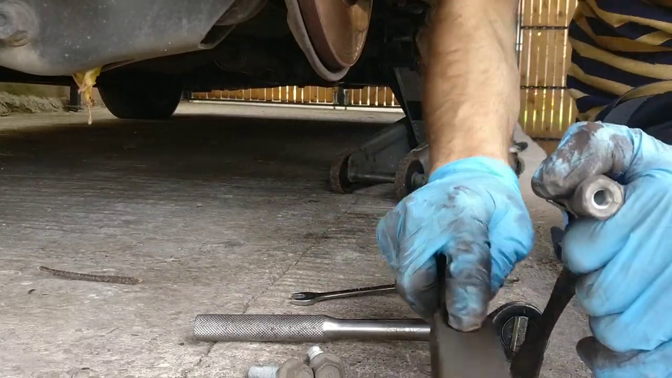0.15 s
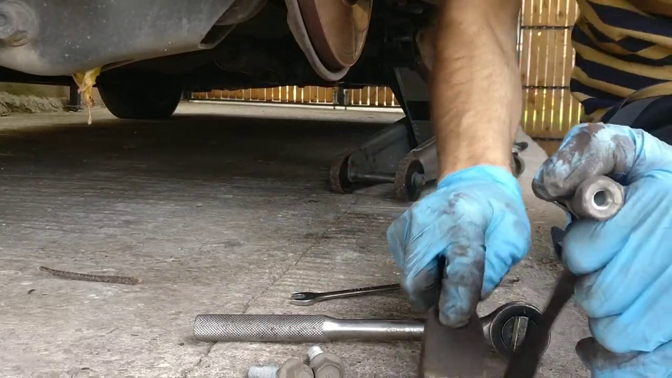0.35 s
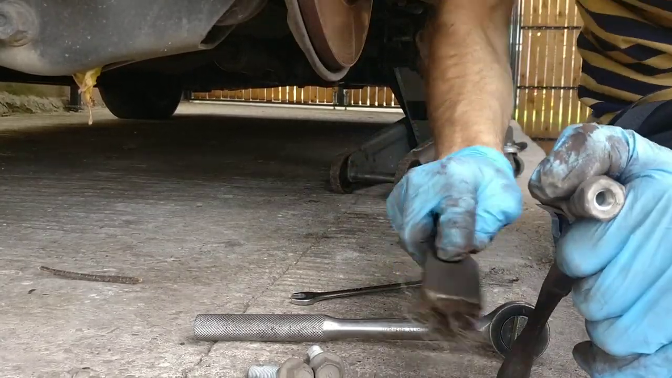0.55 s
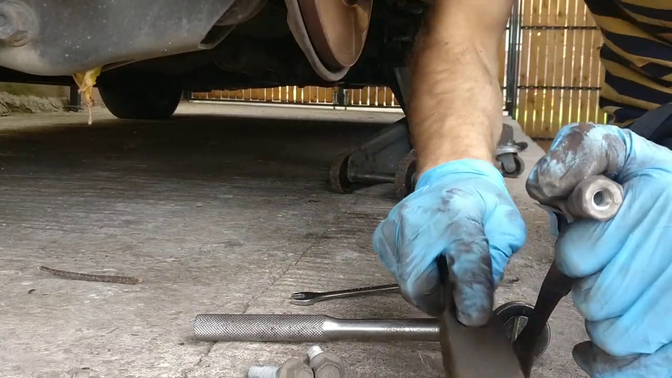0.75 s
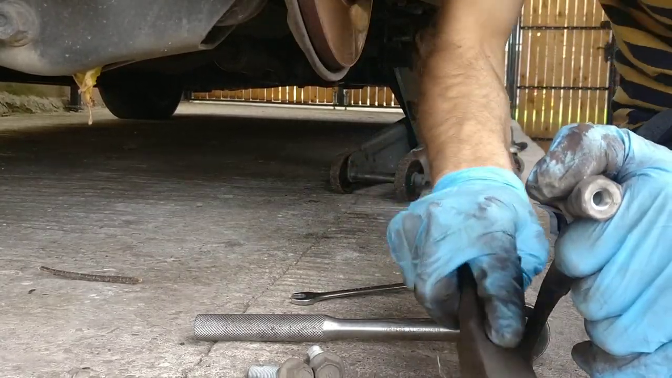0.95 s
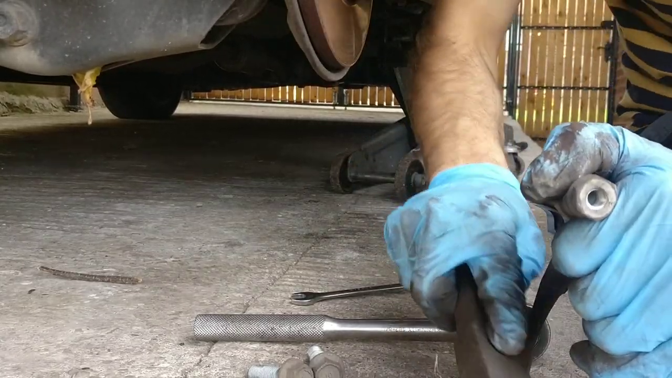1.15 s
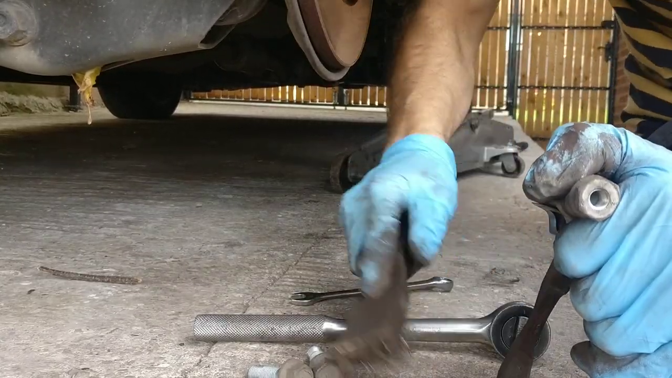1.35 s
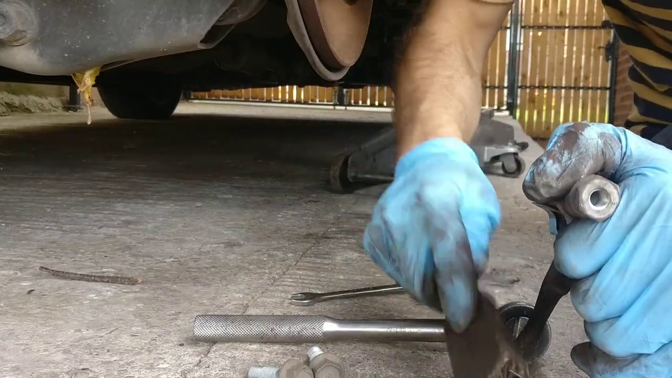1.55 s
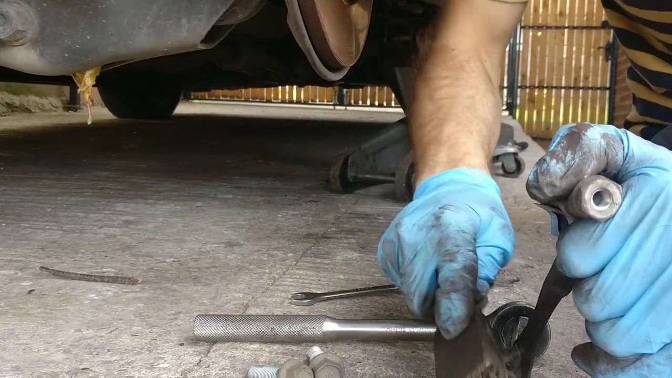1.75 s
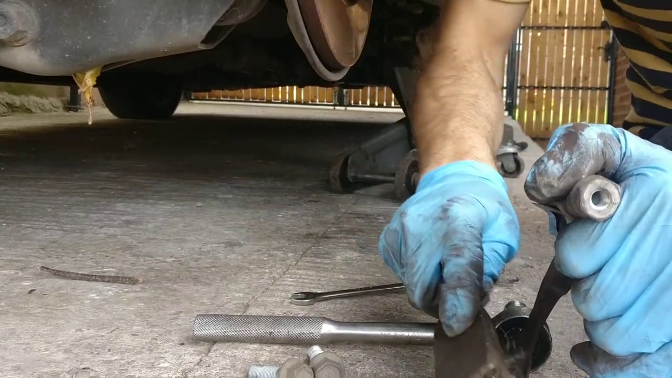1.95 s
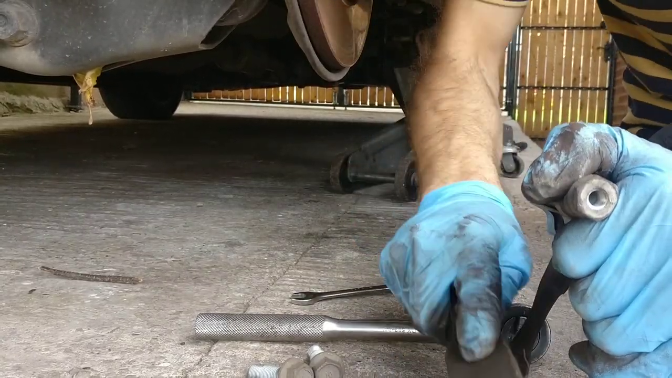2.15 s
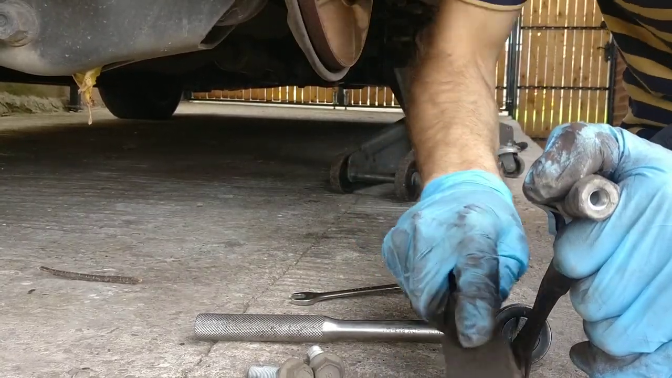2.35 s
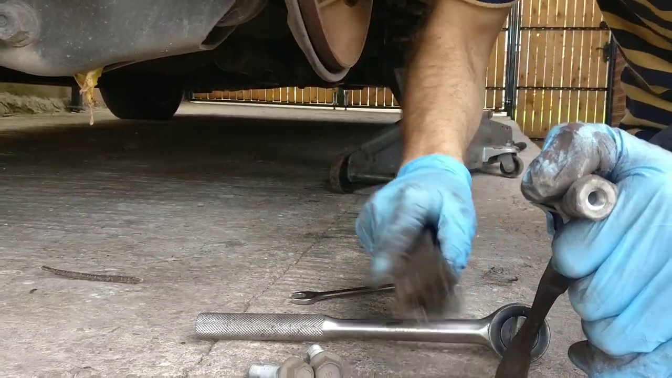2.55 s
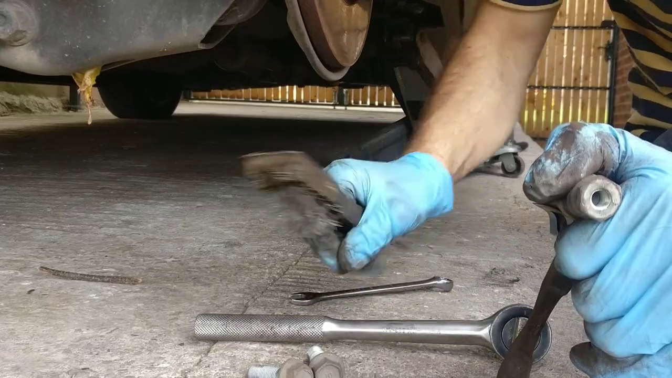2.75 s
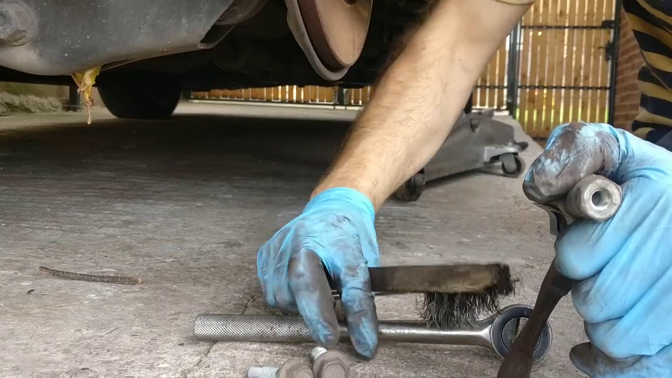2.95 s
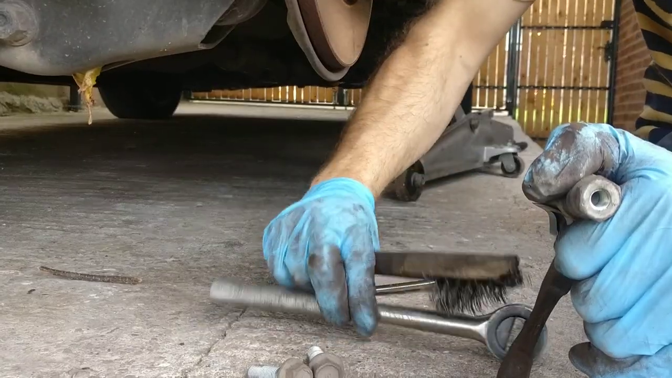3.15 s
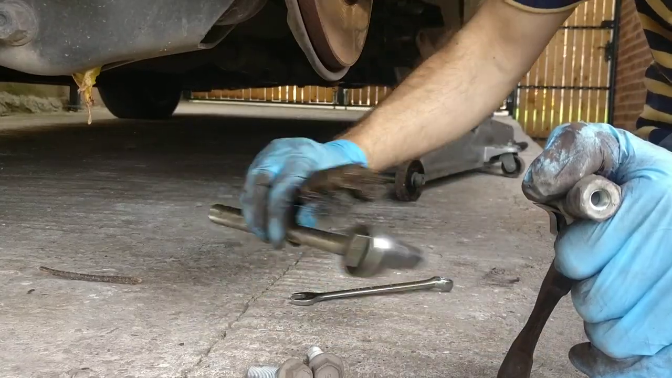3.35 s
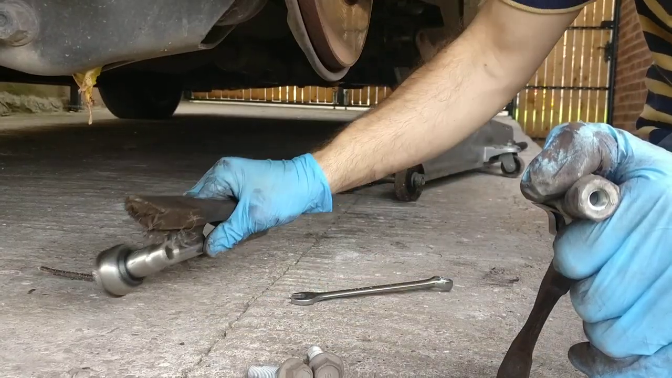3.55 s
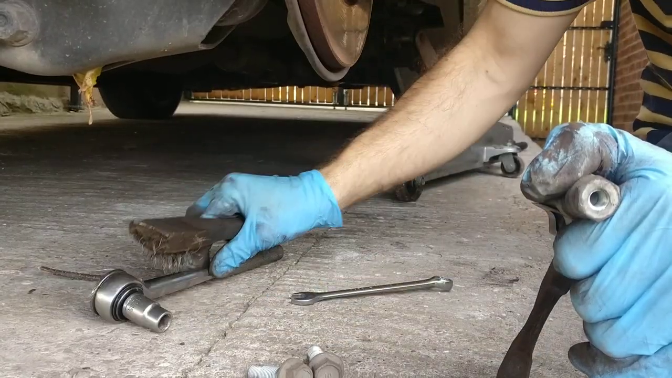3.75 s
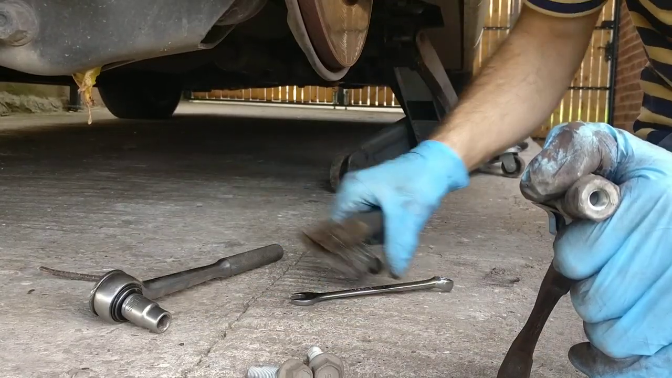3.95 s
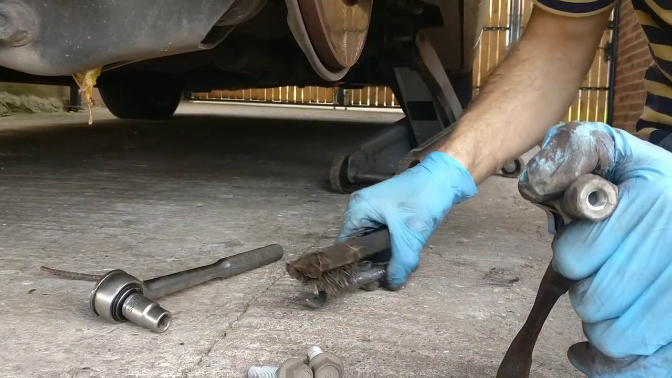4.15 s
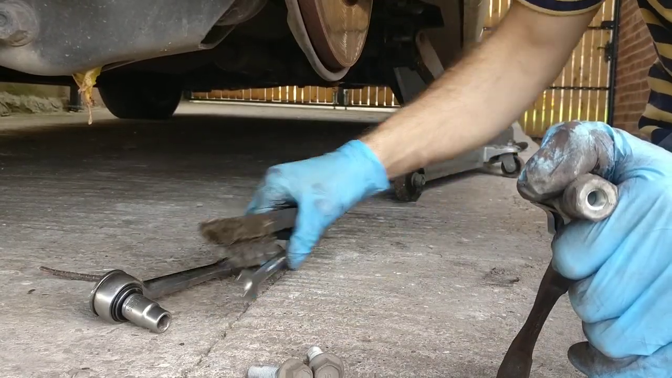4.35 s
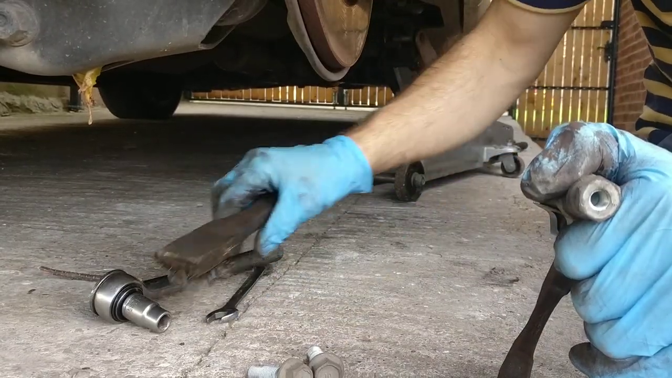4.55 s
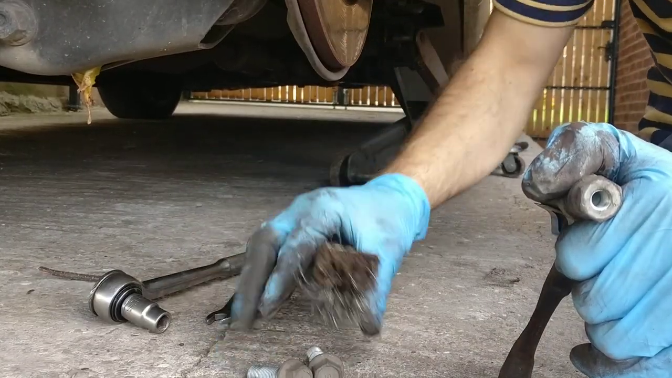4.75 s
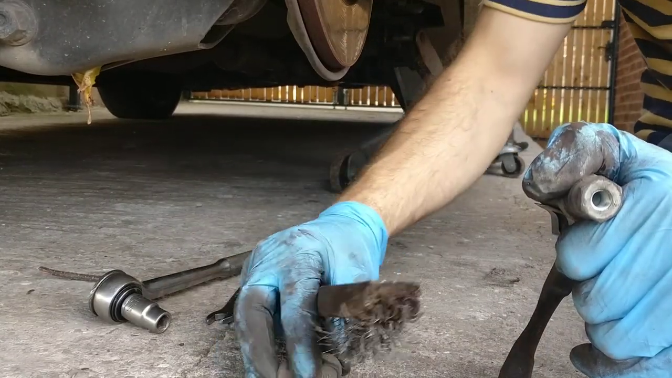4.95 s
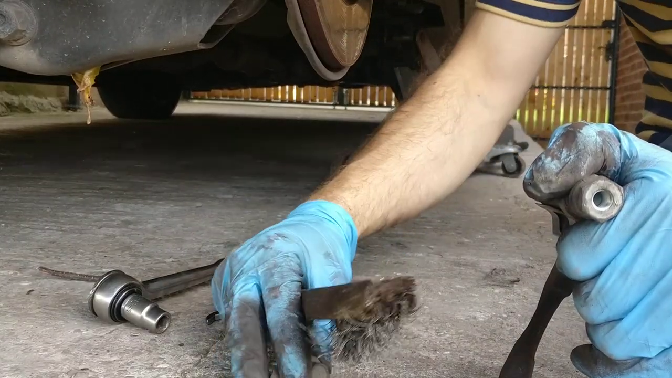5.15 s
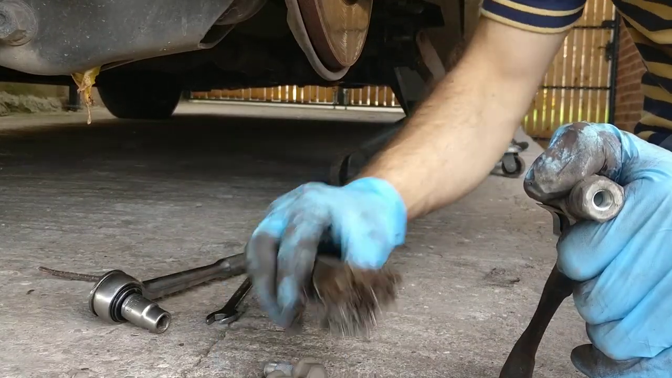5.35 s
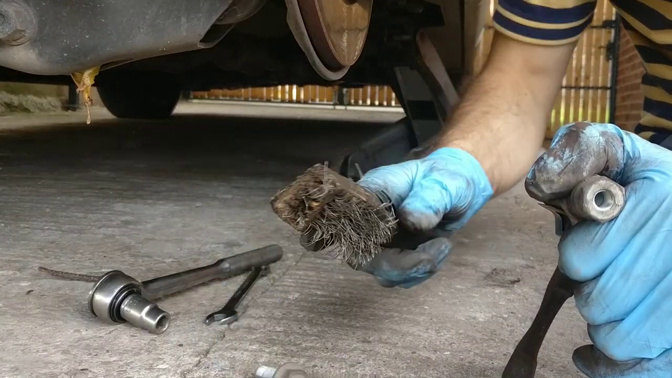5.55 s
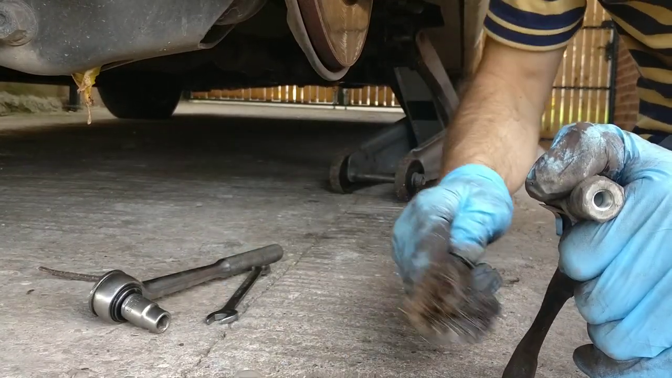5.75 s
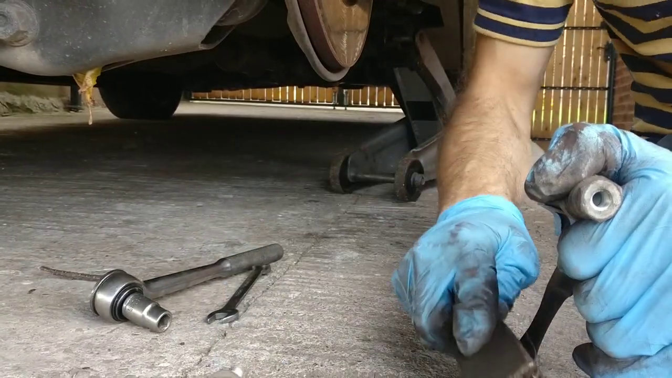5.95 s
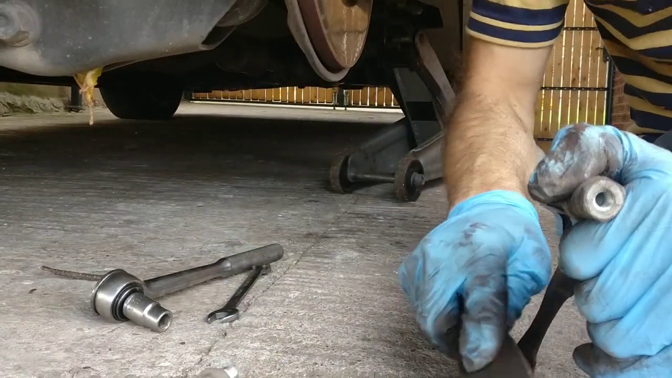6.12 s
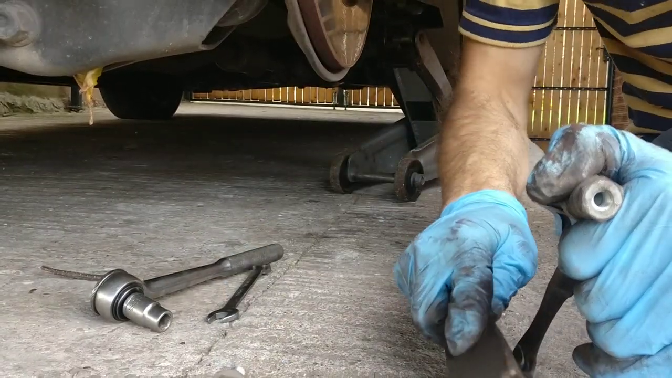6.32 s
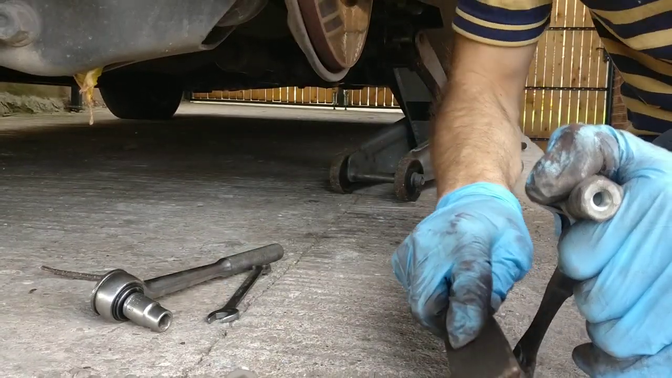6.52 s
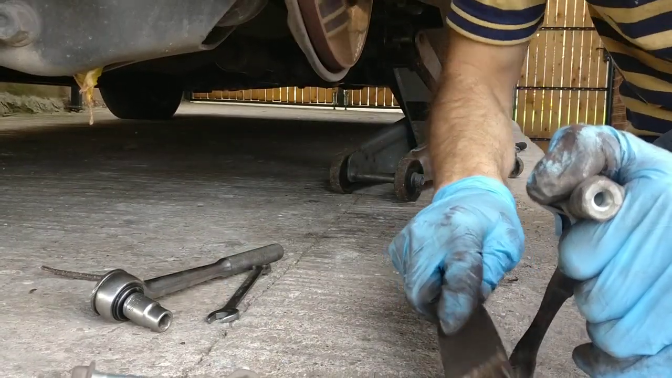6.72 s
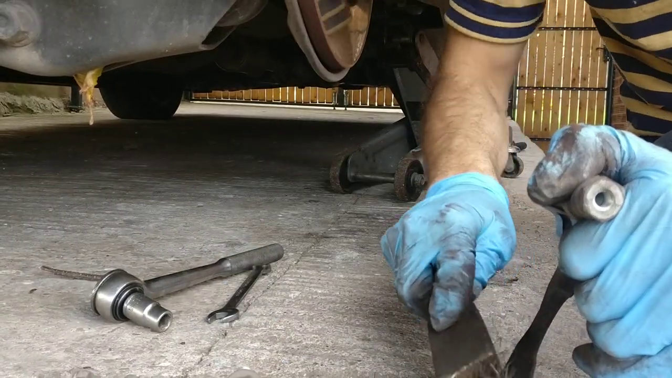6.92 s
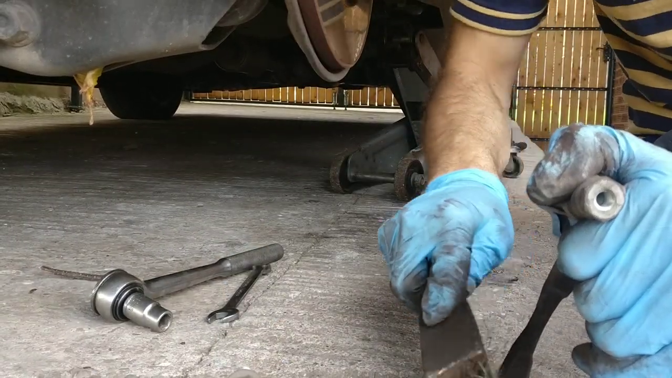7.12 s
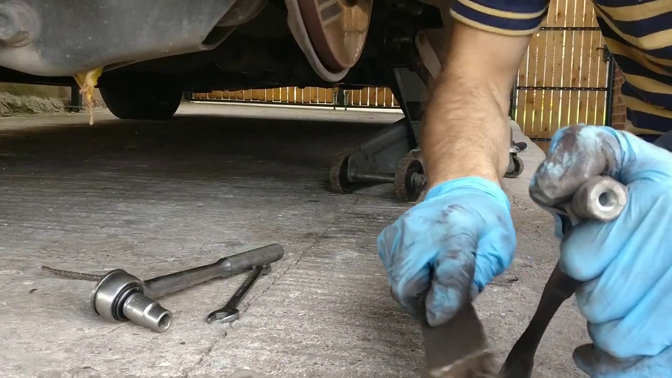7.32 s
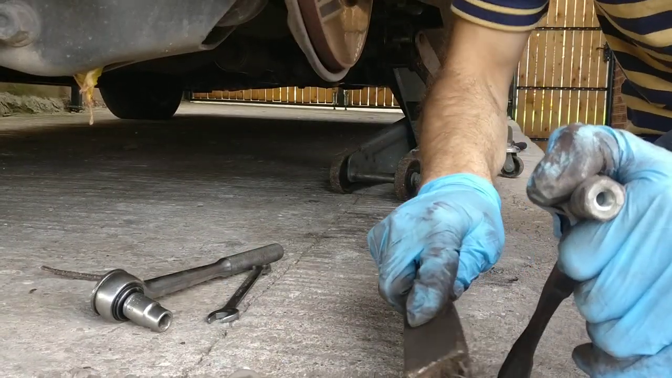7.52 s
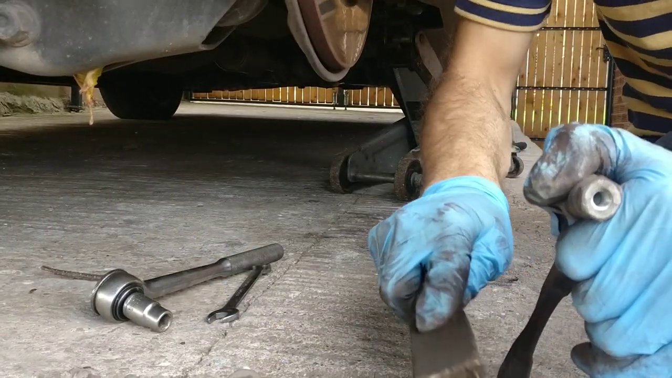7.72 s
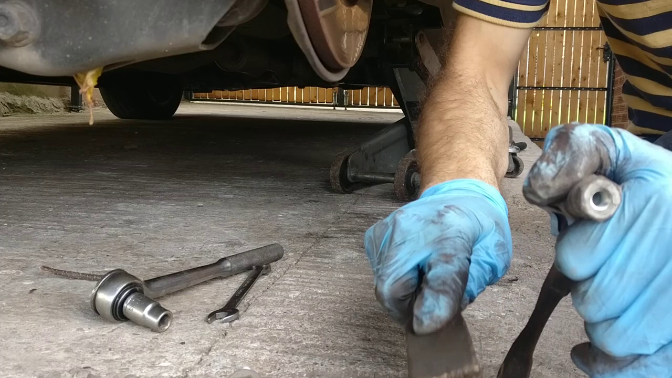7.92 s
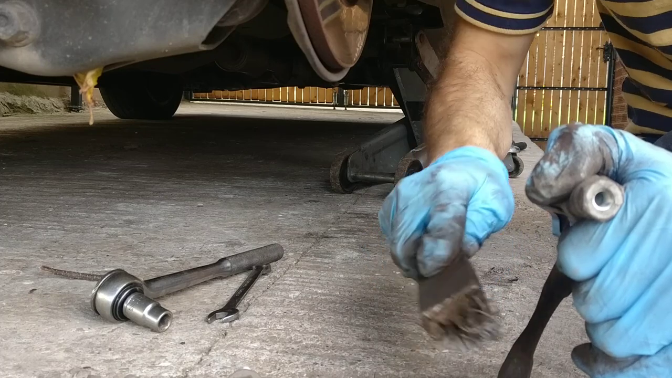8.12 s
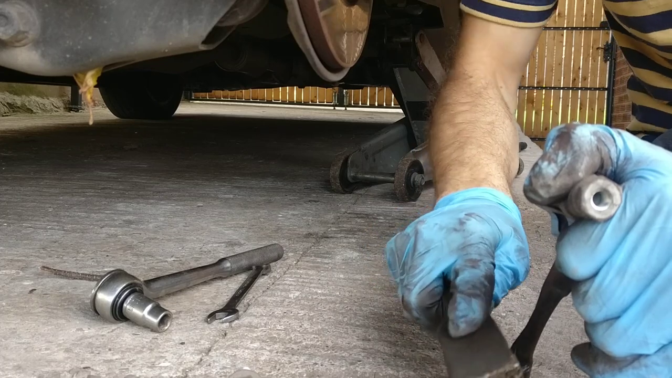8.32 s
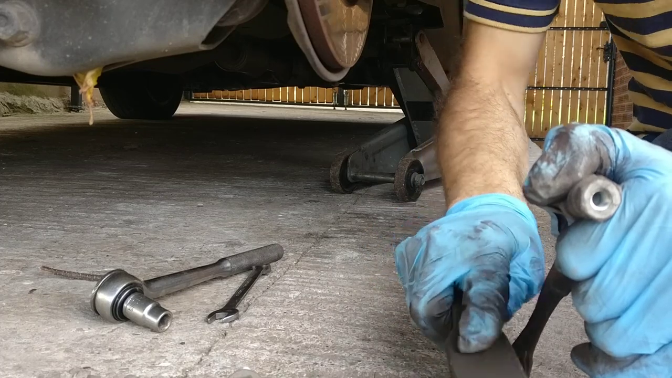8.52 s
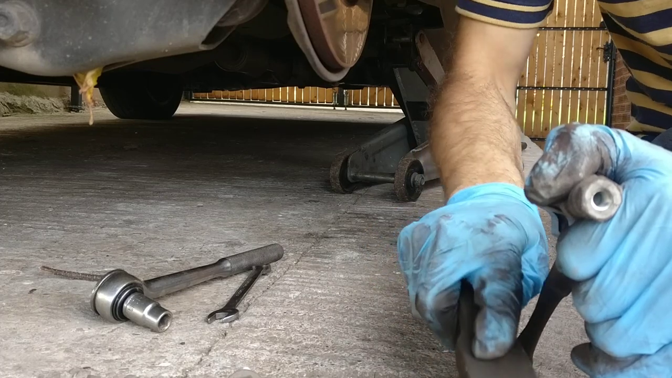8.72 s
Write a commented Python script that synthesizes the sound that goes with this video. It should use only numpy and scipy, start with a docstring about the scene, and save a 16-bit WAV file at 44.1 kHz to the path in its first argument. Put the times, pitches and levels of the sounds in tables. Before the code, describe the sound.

Close, hissing wire brush strokes on metal stop for a ratchet's knock and a spanner's ringing drag, then start again.

```python
"""A steel wire brush scrubs a hand-held brake part close to a stereo microphone, nine strokes a second.
Its wire tips stick and slip, hissing and rasping. In a pause a ratchet is lifted and set down and a
spanner is dragged ringing over the concrete; then the scrubbing goes on. The garage floor and the
car's underside throw the sound back, and far away two motors drone under a wash of outdoor air."""
import sys
import numpy as np
from scipy import signal
from scipy.fft import rfft, irfft
from scipy.io import wavfile

SR = 44100
rng = np.random.default_rng(int(sys.argv[2]) if len(sys.argv) > 2 else 0)


def dump(signal):
    """Clip the signal to [-1, 1] and save it as 16-bit WAV at the path in sys.argv[1]."""
    limited = np.clip(np.atleast_2d(signal).T, -1, 1)
    pcm = np.round(limited * 32767).astype(np.int16)
    wavfile.write(sys.argv[1], SR, pcm)


N = 387198
TIME = np.arange(N) / SR
BINS = np.fft.rfftfreq(N, 1 / SR)

# modes of the brake part: pitch_hz, level_db, t60_s, left_over_right_db
PART_MODES = [(1458, -36.5, .16, 16.5), (2919, -15, 0.042, 12.5), (6940, -10, 0.029, -11),
              (1153, -32.5, 0.54, 0)]


def brush(hiss_db=0.76, rasp_db=-2.5, part_db=-8, snap_db=-10, chatter_db=2.0):
    """Wire tips stick and slip: sparse ticks at the turns, dense hiss at speed, a rasp from the part."""
    # bristles graze the part as the brush lands or leaves: start_s, level_db, fade_s
    grazes = [(0.306, -17.5, 0.044), (0.345, -30, 0.021), (1.456, -17.5, 0.049), (2.422, -32.5, 0.11),
              (5.755, -32, 0.09), (8.066, -22, 0.042)]
    # a tuft catches on an edge and snaps free: start_s, level_db
    snag_events = [(.2235, -11), (.309, -17), (.351, -17.5), (0.631, -13.5), (.7215, -10.5), (.994, -10.5),
                   (1.198, -15.5), (1.4581, -9), (1.7193, -14.5), (1.831, -13), (1.9647, -11.5),
                   (2.2693, -10), (5.859, -12), (6.273, -14.5), (6.387, -11), (6.481, -14), (6.719, -12.5),
                   (6.9597, -7.5), (7.01, -8.5), (7.29, -10.5), (7.4418, -17), (8.1042, -8.5),
                   (8.1348, -11.5)]
    # spectrum of the wire tips: frequency_hz, density_db
    hiss_spectrum = [(5000, -24.5), (7500, -15), (8300, -2), (9200, 3), (10200, 8), (12300, 10.5),
                     (13600, 9), (14800, 4.5), (15600, 6)]
    # spectrum of the scraped face: frequency_hz, density_db
    rasp_spectrum = [(60, -18), (180, -12), (300, -11.5), (480, -20), (900, -10.5), (1400, -2), (2000, 4.5),
                     (2900, 5), (4200, 5.5), (4900, 4.5), (6700, 6.5), (7500, -10.5), (10000, -3.5),
                     (16000, -18)]
    hiss_level = pressure(2, rise_s=.007, fall_s=.0095, land_s=.0017, turn_db=-13.5, swell_db=1.5)
    rasp_level = pressure(3, rise_s=.011, fall_s=.011, land_s=.0025, turn_db=-12.5, swell_db=1.0)
    for start, db, fade_s in grazes:
        graze = gain_of(db - 20 * TIME[:SR // 2] / fade_s)
        add(hiss_level, start, graze)
        add(rasp_level, start, graze * gain_of(-13.5))
    speed = hiss_level / hiss_level.max()
    ticks_per_s = 1000 + 9000 * speed
    # whole tufts snag and let go together, most under a light hand
    catch = evened(gain_of(chatter_db * (0.95 - speed) * wander(70)[0] + 1.58 * wander(450)[0]))
    # single stiff wires spring free
    flick = rng.standard_normal((2, 128)) * np.exp(-np.linspace(0, 5, 128))
    flicks = signal.oaconvolve(slips(110, spread_db=3.5)[None], flick, axes=1)[:, :N]
    snaps = gain_of(snap_db) * evened(flicks) / (speed + 0.3) ** .5
    snags = np.zeros((2, N))
    for start, db in snag_events:
        add(snags, start, gain_of(db) * burst(8000, t60=0.0099, octaves=7.9))
    tip_force = (slip_pair(ticks_per_s, spread_db=4) * catch + snaps) * hiss_level
    hiss = coloured(snags + grainy(tip_force, t60=0.017, share=0.62), hiss_spectrum)
    pits = evened(gain_of(1.33 * wander(110)[0]))  # rust makes the part's face uneven
    face_force = (slip_pair(ticks_per_s, spread_db=5) * catch * pits + gain_of(-2) * snaps) * rasp_level
    scrape = gain_of(-16) * snags + grainy(face_force, t60=0.038, share=0.84)
    part_ring = sum(panned(gain_of(db) * evened(ring(scrape[0], hz, t60)), pan)
                    for hz, db, t60, pan in PART_MODES)
    friction = gain_of(hiss_db) * hiss + gain_of(rasp_db) * coloured(scrape, rasp_spectrum)
    return mic_pair(friction) + gain_of(part_db) * scrape.std() * part_ring


def pressure(column, rise_s, fall_s, land_s, turn_db, swell_db, turn_max_s=.12):
    """Each stroke bites, sweeps and stops; through the turn that follows, the bent wires still creep."""
    # push and pull in turn: start_s, end_s, hiss_db (column 2), rasp_db (column 3)
    strokes = [(0.001, 0.037, -17, -28.5), (0.104, 0.175, -16, -31.5), (0.226, 0.263, -16.5, -25),
               (0.505, 0.585, -14.5, -30.5), (0.637, 0.702, -16, -32.0), (0.761, 0.832, -15.5, -27.5),
               (0.877, 0.944, -14, -30), (1, 1.059, -15, -25.5), (1.114, 1.2, -16, -28.5),
               (1.492, 1.552, -17.5, -29), (1.605, 1.685, -15.5, -30.5), (1.723, 1.785, -14.5, -28),
               (1.846, 1.896, -16, -31.5), (1.97, 2.034, -17, -29), (2.085, 2.149, -15.5, -31),
               (2.196, 2.26, -15.5, -28), (2.311, 2.384, -17, -32.5), (5.776, 5.804, -22.5, -33.5),
               (5.865, 5.908, -15.5, -30.5), (5.968, 6.012, -16, -28), (6.065, 6.138, -13, -31),
               (6.191, 6.246, -16, -28.5), (6.281, 6.347, -13, -31), (6.406, 6.457, -13, -28.5),
               (6.501, 6.568, -14, -30), (6.622, 6.692, -15.5, -28), (6.729, 6.803, -16, -32),
               (6.842, 6.899, -14.5, -27), (6.956, 7.025, -18.5, -35), (7.064, 7.124, -16.0, -27),
               (7.171, 7.242, -16, -32), (7.285, 7.332, -15.5, -28), (7.38, 7.44, -18.5, -33.5),
               (7.486, 7.555, -16.5, -30.0), (7.599, 7.662, -17, -33.5), (7.71, 7.772, -18.5, -30.5),
               (7.833, 7.903, -16, -32.5), (8.095, 8.173, -25, -35), (8.222, 8.295, -18, -34),
               (8.333, 8.401, -16, -28.5), (8.456, 8.509, -15.5, -31.5), (8.557, 8.623, -15.5, -27.5),
               (8.669, 8.744, -14.0, -31)]
    power, last_end = np.zeros(N), -np.inf
    next_starts = [row[0] for row in strokes[1:]] + [np.inf]
    for row, next_start in zip(strokes, next_starts):
        start, end = row[:2]
        t = TIME[max(int((start - .06) * SR), 0):int((end + .12) * SR)]
        bite_s = rise_s if start - last_end < turn_max_s else land_s  # a lifted brush lands anew
        sweep = (1 + np.tanh((t - start) / bite_s)) * (1 + np.tanh((end - t) / fall_s)) / 4
        sweep *= gain_of(swell_db * np.clip((t - start) / (end - start), 0, 1)) ** 2
        creep = (t > end) * (t < next_start) * (next_start - end < turn_max_s)
        add(power, t[0], gain_of(row[column]) ** 2 * (sweep + creep * gain_of(turn_db) ** 2))
        last_end = end
    return np.sqrt(power)


def grainy(force, t60, share, block=2048):
    """Short random rings, renewed every few hundredths of a second, give a shifting, grainy colour."""
    rings = np.zeros((2, N))
    for at in range(0, N - block, block):
        response = rng.standard_normal((2, block)) * gain_of(-60 * TIME[:block] / t60)
        response /= np.linalg.norm(response[0])
        add(rings, at / SR, signal.fftconvolve(force[:, at:at + block], response, axes=1))
    return np.sqrt(1 - share) * force + np.sqrt(share) * rings


def bumps():
    """Held things bump with a short thud; a blow on the part adds the note of one of its modes."""
    # dull bumps of brush, hand and tools: start_s, level_db, centre_hz, t60_s
    soft_hits = [(.002, -28.5, 224, 0.11), (0.06, -20, 2700, 0.015), (.267, -34, 373, 0.1),
                 (0.27, -30, 1440, 0.063), (1.4575, -25, 1120, 0.017), (1.563, -25.5, 2740, 0.042),
                 (1.639, -38, 183, 0.097), (3.613, -41.5, 260, 0.092), (6.099, -30.5, 155, 0.064)]
    # brush blows that ring the part's nearest mode: start_s, level_db, pitch_hz
    part_blows = [(1.201, -52, 1158), (5.786, -34, 1458), (5.998, -32, 1458)]
    thuds, notes, t = np.zeros((2, N)), np.zeros(N), TIME[:SR]
    for start, db, hz, t60 in soft_hits:
        add(thuds, start, gain_of(db) * burst(hz, t60, octaves=0.36))
    for start, db, pitch in part_blows:
        hz, _, t60, _ = min(PART_MODES, key=lambda mode: abs(mode[0] - pitch))
        add(notes, start, gain_of(db - 60 * t / t60) * np.sin(2 * np.pi * hz * t))
    return mic_pair(thuds) + notes


def spanner(slide_db=-18.5, flutter_db=3, hops_per_s=120, hop_db=-22.5):
    """The loose spanner is struck and then skates over the concrete, which keeps its modes singing."""
    # modes of the spanner: pitch_hz, level_db, t60_s, left_over_right_db
    modes = [(710, -45, .08, 2), (900, -44, .06, 2), (2040, -32, .12, 6), (2140, -33, .1, 6),
             (3009, -30, .13, 5), (4311, -17, .25, 0), (5519, -14, .25, -1), (7328, -6.5, .2, -3),
             (9400, -22, .14, 11), (10272, -16, .14, 20), (11172, -4, .19, 17), (13545, -19, .16, 11),
             (15452, -9, .11, 2)]
    # blows on the floor, damped by the fingers: start_s, ring_db, favoured_hz, click_db, t60_share
    clinks = [(3.939, -25.5, 7940, -51, .6), (3.987, -30.5, 4300, -50, .6),
              (4.001, -15.5, 15600, -28.5, .6), (4.294, -1.5, 2470, -30, .55),
              (4.353, -9.5, 11340, -14.5, 1), (4.386, -19.5, 4510, -25, .7),
              (4.405, -16.5, 7450, -17.5, .7), (4.427, -20, 2950, -25, .6), (4.46, -19.5, 2440, -36.5, .6)]
    # stick and slip locks onto a mode: peak_s, half_length_s, pitch_hz, level_db
    squeals = [(4.02, .025, 2090, -10.5), (4.02, .02, 3009, -25), (4.023, 0.023, 5519, -27.5),
               (4.036, 0.024, 4311, -9), (4.422, 0.036, 15452, -12.5), (4.425, 0.036, 11172, -23.5),
               (4.43, 0.03, 7328, -9.5), (4.485, .055, 5519, -9), (4.485, 0.078, 9400, -8),
               (4.505, .04, 10272, -6.5)]
    force = drag_force()
    grit_spectrum = [(4000, -29), (7000, -4.5), (8500, -10), (11500, 9.5), (14000, -14)]
    grit = gain_of(-38) * force * coloured(slip_pair(500, spread_db=5), grit_spectrum)
    for start, _, _, click_db, _ in clinks:
        add(grit, start, gain_of(click_db) * burst(5600, t60=0.013, octaves=0.35, order=8))
    ringing, t = np.zeros((2, N)), TIME[:SR // 2]
    hops = gain_of(hop_db) * force * (rng.random(N) < hops_per_s / SR)  # over grains in the concrete
    for hz, db, t60, pan in modes:
        struck = ring(hops * rng.standard_normal(N), hz, t60 / 2)  # each landing is choked by the next
        for start, ring_db, favoured_hz, _, t60_share in clinks:
            drive = 1 / (1 + (np.log2(hz / favoured_hz) / 0.19) ** 2)  # each blow lands on another spot
            decay = gain_of(ring_db - 60 * t / (t60 * t60_share))
            add(struck, start, drive * decay * np.sin(2 * np.pi * hz * t))
        squeal = sum(gain_of(peak_db) * np.exp(-((TIME - peak) / half) ** 2)
                     for peak, half, pitch, peak_db in squeals if abs(hz / pitch - 1) < .055)
        # grains jog each mode's height and phase; the low modes bend most and are shaken hardest
        rough = min(600 / hz + .06, .35)
        height = gain_of(slide_db + flutter_db * wander(40)[0] + 10 * rough * wander(100)[0]) * force
        phase = 2 * np.pi * hz * TIME + .5 * wander(35)[0] + rough * wander(140)[0]
        ringing += panned(gain_of(db) * (struck + (height + squeal) * np.sin(phase)), pan)
    # a ringing bar sends its waves out of step to the two sides: the right lags by 1.7 radians
    ringing[1] = irfft(rfft(ringing[1]) * np.exp(-1.7j), N)
    return mic_pair(grit) + ringing


def drag_force(rise_s=.003, release_db_per_s=281):
    """A drag grips at once, holds, and dies away as the spanner slows."""
    # pulls over the floor: start_s, length_s, force_db
    drags = [(3.942, 0.0065, -23.5), (3.985, 0.071, -35.5), (4.351, 0.15, -1)]
    return sum(np.clip((TIME - start) / rise_s, 0, 1)
               * gain_of(db - release_db_per_s * np.maximum(TIME - start - length, 0))
               for start, length, db in drags)


def knocks(rattle_gap_s=0.008, rattle_db=-12.5, head_t60_s=0.069):
    """Steel cracks and crunches on grit and chatters to rest, and the heavy ratchet rings briefly."""
    # ratchet and brush knock on the concrete: start_s, level_db, centre_hz, t60_s, width_octaves
    floor_hits = [(2.901, -29.5, 10100, 0.011, 0.38), (2.972, -16.5, 7700, .024, 0.66),
                  (3.089, -36.5, 6470, 0.014, 1.3), (3.5483, -21.5, 5760, 0.035, 0.79),
                  (3.5981, -23, 11880, 0.017, 0.43), (3.612, -26, 5000, 0.041, 0.79),
                  (3.622, -11, 10800, 0.022, 0.28), (3.6215, -25.5, 4300, 0.026, 0.68),
                  (3.63, -26, 10500, .03, 0.37), (3.635, -25, 4040, 0.021, 1.37),
                  (4.762, -35.5, 12850, 0.017, 0.33), (5.022, -29.5, 4810, 0.0032, 1.2)]
    # the ratchet's head lands and rocks: start_s, level_db, pitch_hz
    head_blows = [(3.5473, -26.5, 2930), (3.5516, -27.5, 2947), (3.6116, -32.5, 3120), (3.6168, -40, 3150),
                  (3.639, -37, 3090)]
    # upper modes of the ratchet: pitch_hz, level_db, t60_s, left_over_right_db
    ratchet_modes = [(4580, -16, 0.02, 1), (5414, -1, 0.037, -5), (7340, -15, 0.038, -1),
                     (10400, -16, .035, 16), (11300, -11, .035, 14), (12400, -11, .035, 18)]
    crunch, head, blows, t = np.zeros((2, N)), np.zeros(N), np.zeros(N), TIME[:SR // 2]
    for start, db, hz, t60, octaves in floor_hits:
        body = burst(hz, t60, octaves, order=6)
        crack = gain_of(-2) * burst(hz, t60=0.0013, octaves=octaves, order=6)
        add(crunch, start, gain_of(db) * (body + crack))
        for k, delay in enumerate(np.cumsum(rattle_gap_s * rng.uniform(0.3, 1.4, 3))):
            bounce = burst(3500, t60=0.011, octaves=0.62)
            add(crunch, start + delay, gain_of(db + rattle_db - 5 * k) * bounce)
    for start, db, hz in head_blows:
        add(blows, start, gain_of([db]))
        phase = 2 * np.pi * hz * t + .5 * wander(400)[0, :len(t)]  # grit jogs the ring
        add(head, start, gain_of(db - 60 * t / head_t60_s) * np.sin(phase))
    overtones = sum(panned(gain_of(db) * ring(blows, hz, t60), pan) for hz, db, t60, pan in ratchet_modes)
    return mic_pair(crunch) + panned(head, db=12) + overtones


def fiddling():
    """Small parts and grit tick at random under the fingers."""
    # picking about on the floor: start_s, length_s, ticks_per_s, level_db, centre_hz
    spells = [(4.832, .19, 60, -52, 2290)]
    ticks = np.zeros((2, N))
    for start, length, per_s, db, hz in spells:
        for when, softness in rng.random((round(length * per_s), 2)):
            tick = gain_of(db - 7.1 * softness) * burst(hz, t60=0.023, octaves=0.77)
            add(ticks, start + when * length, tick)
    return mic_pair(ticks)


def rustle(handling_db=-72):
    """Rubber glove and loose bristles crackle faintly, swelling with each rub."""
    # glove and bristles brush past things as the tools are moved: peak_s, level_db, fade_s
    rubs = [(1.262, -47.5, 1), (2.675, -40.5, 0.073), (2.79, -51, 0.11), (2.982, -45.5, 0.24),
            (3.677, -43.5, 0.13), (3.974, -44.5, 0.093), (4.126, -52.5, 0.083), (5.157, -54, 0.13),
            (5.317, -53.5, 0.13), (5.464, -53, 0.074), (5.56, -44.5, 0.038)]
    spectrum = [(300, -13.5), (1800, -3), (4000, -1), (7700, -5), (10000, 4), (12500, 7), (16000, -3.5)]
    power = sum(gain_of(db - 16 * np.abs(TIME - peak) / fade_s) ** 2 for peak, db, fade_s in rubs)
    crackle = slip_pair(3100, spread_db=6.4) * gain_of(0.58 * wander(24))
    return mic_pair(coloured(crackle * np.sqrt(power + gain_of(handling_db) ** 2), spectrum))


def far_motors(motor_hz=81.7, waver=0.00495, flutter_db=2.5):
    """Far off to the right, a steady motor beats against an engine that eases off and picks up."""
    # loudness of the motor: time_s, level_db
    motor_levels = [(0, -53), (1.9, -58.5), (5.15, -54), (5.5, -55.5), (6.1, -50.5), (7.3, -49), (8, -60)]
    # harmonics of the motor: multiple, level_db
    motor_orders = [(1, -3), (2, -22), (3, -19.5)]
    # course of the engine: time_s, firing_hz, fundamental_db, octave_db
    engine = [(0, 94.5, -56, -70), (1.7, 93.14, -59, -58), (2.999, 91.9, -64, -66.5),
              (3.8, 87.5, -52.5, -63), (4.398, 85.5, -60.5, -76), (5.3, 81.66, -66, -60),
              (6.798, 87.14, -53, -66), (8.78, 90.5, -54.5, -73)]
    firing_hz, *engine_db = over_time(engine)
    motor_db, = over_time(motor_levels)
    motor_phase, engine_phase = (2 * np.pi * np.cumsum(hz * (1 + waver * wander(1.7)[0])) / SR
                                 for hz in (motor_hz, firing_hz))
    tones = [gain_of(motor_db + db) * np.sin(k * motor_phase) for k, db in motor_orders]
    tones += [gain_of(db) * np.sin(k * engine_phase) for k, db in enumerate(engine_db, 1)]
    flutter = gain_of(flutter_db * wander(3, count=len(tones)))
    return panned(np.sqrt(2) * (tones * flutter).sum(0), db=-7)


def outdoor_air(level_db=-58):
    """A low, even wash of air from outside."""
    # spectrum of the air: frequency_hz, density_db
    spectrum = [(20, -22), (55, 7.5), (120, 4), (240, -3), (400, -18), (1000, -21), (2500, -23),
                (7000, -28), (11000, -31), (16000, -23)]
    return gain_of(level_db) * mic_pair(coloured(rng.standard_normal((2, N)), spectrum))


def garage(x, early_db=-10, tail_db=-15, t60=0.39):
    """Quick echoes off floor and car body, then a short diffuse tail."""
    early, t = np.zeros((2, SR // 20)), TIME[:SR // 2]
    for side in early:
        side[(rng.uniform(.0012, .014, 8) * SR).astype(int)] = rng.choice([-1, 1], 8) / np.sqrt(8)
    noise = rng.standard_normal((2, len(t))) * np.clip(t / 0.0029, 0, 1)
    body = signal.sosfiltfilt(signal.butter(4, 11000, fs=SR, output="sos"), noise)
    tail = body * gain_of(-60 * t / t60) + (noise - body) * gain_of(-60 * t / 0.12)  # the top dies first
    tail /= np.linalg.norm(tail[0])
    echo = lambda response: signal.fftconvolve(x, response, axes=1)[:, :N]
    return x + gain_of(early_db) * echo(early) + gain_of(tail_db) * echo(tail)


def mic_pair(pair):
    """The two microphones hear much the same bass; the right lags a little and is shaded in the treble."""
    # likeness of the two sides: frequency_hz, correlation
    likeness = [(60, 0.5), (300, .93), (1400, 0.51), (3100, .36), (4800, 0.17), (6500, 0.23), (8000, .05)]
    # shading of the right microphone: frequency_hz, gain_db
    shadow = [(7000, -1.5), (8500, -11), (10000, -12.5), (11800, -25.5), (13500, -8), (14700, -9.5),
              (15600, 0.5)]
    # phase lag of the right microphone: frequency_hz, lag_radians
    lag = [(1000, 0.13), (4200, 0.55), (4750, 4.3), (7200, 2.17)]
    left, unrelated = rfft(pair)
    same = over_bins(likeness)
    shade = gain_of(over_bins([(5500, -1.3)] + shadow)) * np.exp(-1j * over_bins(lag))
    right = shade * (same * left + np.sqrt(1 - same ** 2) * unrelated)
    return irfft(np.array([left, right]), N)


def slips(per_s, spread_db):
    """Random clicks of uneven size, of mean power 1 at any rate."""
    chance = np.clip(per_s / SR, 1e-4, 1)
    size = gain_of(spread_db * np.clip(rng.standard_normal(N), -2, 2)) * rng.choice([-1, 1], N)
    return evened(size * (rng.random(N) < chance) / np.sqrt(chance))


def slip_pair(per_s, spread_db):
    """Two unrelated streams of clicks, one a side."""
    return np.array([slips(per_s, spread_db) for _ in range(2)])


def burst(hz, t60, octaves, order=4):
    """A short dying crunch around hz, on both sides."""
    t, f = TIME[:8192], np.fft.rfftfreq(8192, 1 / SR)
    band = 1 / (1 + (np.log2((f + 1) / hz) / octaves) ** order)
    noise = irfft(rfft(rng.standard_normal((2, len(t)))) * np.sqrt(band))
    return evened(noise) * gain_of(-60 * t / t60)


def ring(force, hz, t60):
    """One mode: a unit click leaves a dying sine of height 1."""
    pole = np.exp((2j * np.pi * hz - np.log(1000) / t60) / SR)
    return signal.lfilter([pole.imag], np.poly([pole, pole.conjugate()]).real, force + 1e-15)


def wander(hz, count=1):
    """Rows of random drift, of rms about 1, that move at up to hz."""
    knots = rng.standard_normal((count, 8192))
    return np.array([np.interp(TIME * 2 * hz, np.arange(len(k)), k) for k in knots]) * np.sqrt(3 / 2)


def coloured(x, spectrum):
    """Filters by rows of frequency_hz, density_db; white sound keeps its power."""
    return irfft(rfft(x) * evened(gain_of(over_bins(spectrum))), N)


def over_bins(points):
    """A table's value at every frequency bin, on a log axis."""
    hz, value = np.transpose(points)
    return np.interp(np.log(BINS + 1), np.log(hz + 1), value)


def over_time(rows):
    """One curve for each column after a table's times."""
    times, *columns = np.transpose(rows)
    return [np.interp(TIME, times, column) for column in columns]


def gain_of(db):
    """Decibels to a factor."""
    return 10 ** (np.asarray(db) / 20)


def evened(x):
    """Scales to rms 1."""
    return x / np.sqrt(np.mean(x ** 2) + 1e-20)


def panned(x, db):
    """Places a sound by its left-right level difference."""
    return x * gain_of([[db / 2], [-db / 2]])


def add(mix, start_s, sound):
    """Lays a sound into the mix."""
    span = mix[..., max(round(start_s * SR), 0):][..., :sound.shape[-1]]
    span += sound[..., :span.shape[-1]]


def scene():
    """Brush and tools sound in the garage; the spanner rings clear, with faint early echoes."""
    clear_spanner = garage(spanner(), early_db=-17, tail_db=-14, t60=.31)
    brush_and_tools = garage(brush() + bumps() + knocks() + fiddling() + rustle())
    return brush_and_tools + clear_spanner + far_motors() + outdoor_air()


def record(dry, ceiling=.9, edge_hz=15850):
    """The recorder rounds off the highest peaks and limits the band."""
    held = dry / (1 + (dry / ceiling) ** 6) ** (1 / 6)
    lowpass = signal.firwin(511, edge_hz, window=("kaiser", 9), fs=SR)
    return signal.oaconvolve(held, lowpass[None], "same")


dry = scene()
out = record(dry)
dump(out)
```